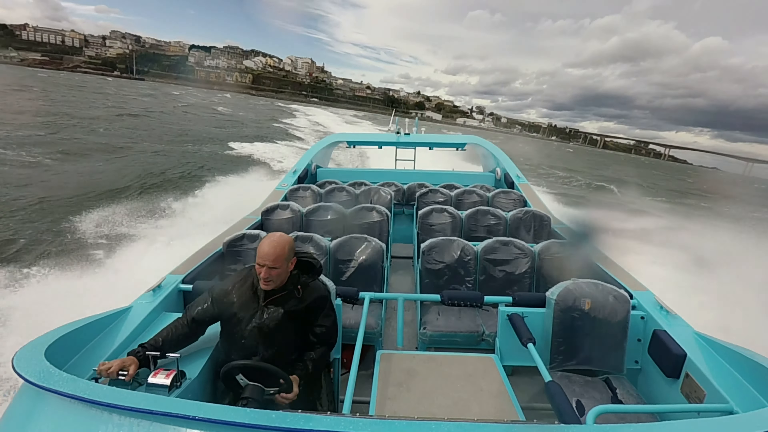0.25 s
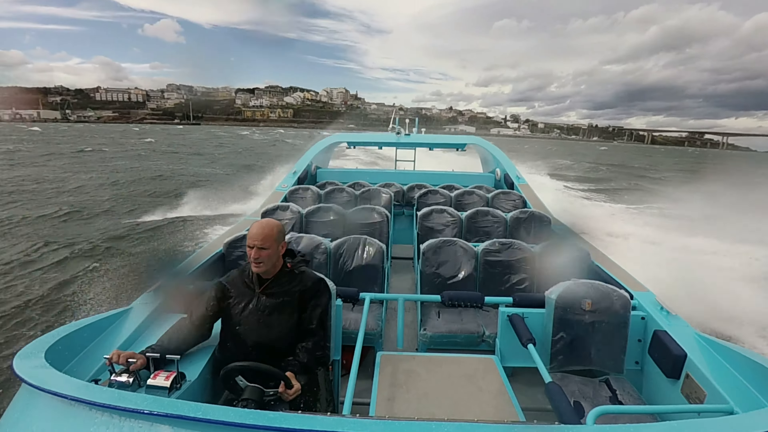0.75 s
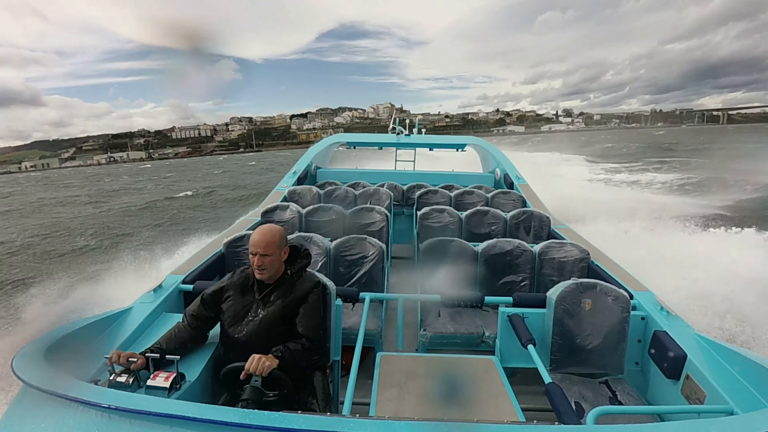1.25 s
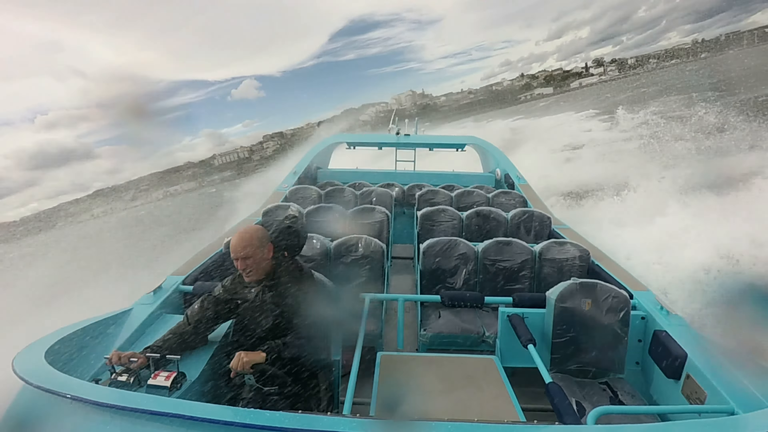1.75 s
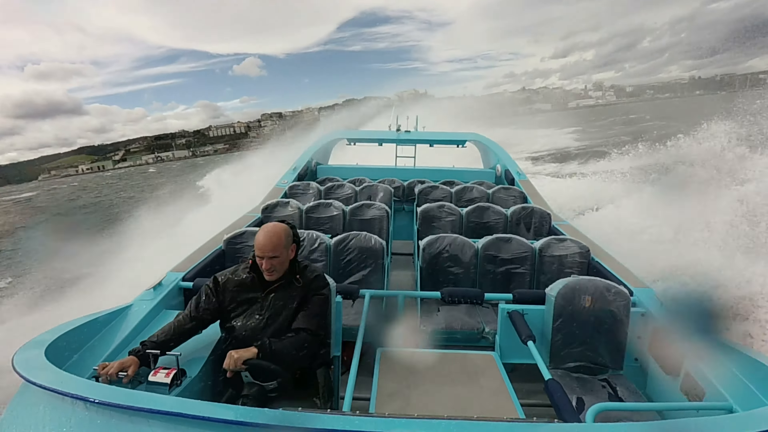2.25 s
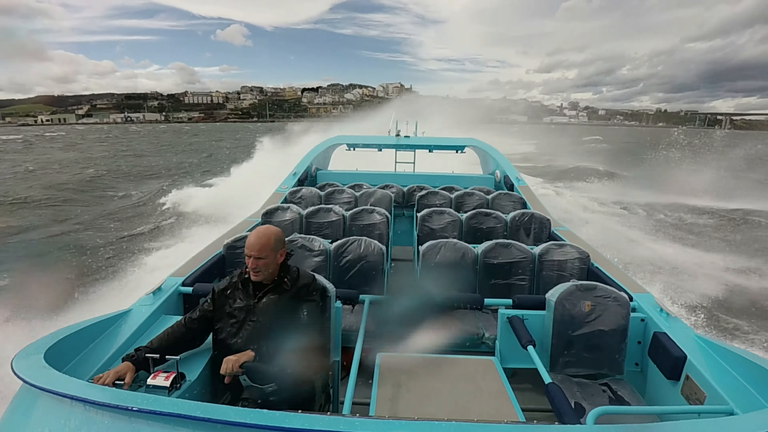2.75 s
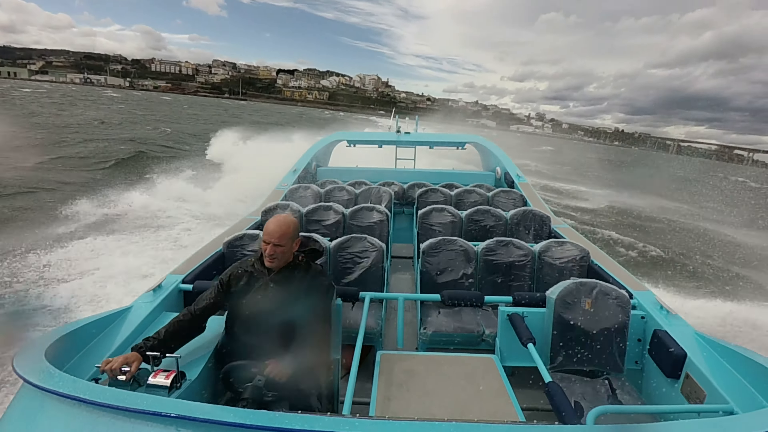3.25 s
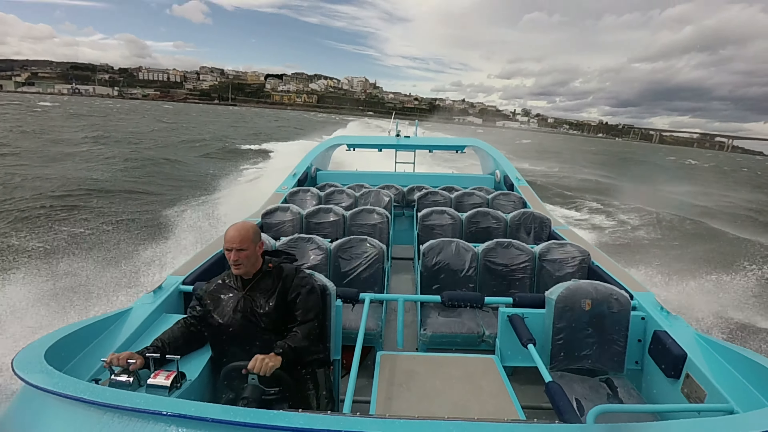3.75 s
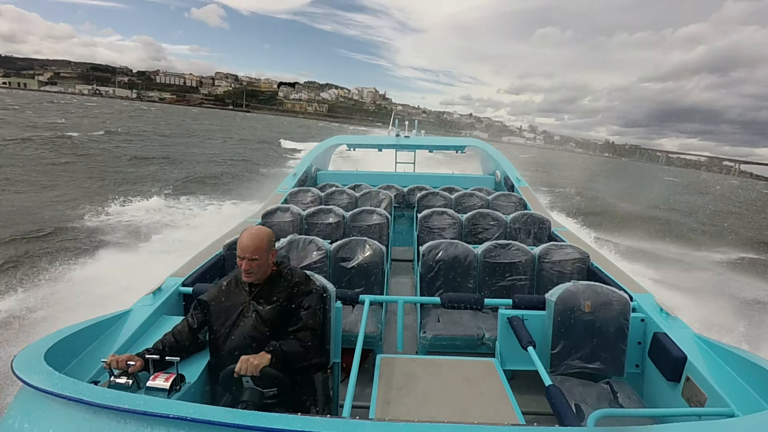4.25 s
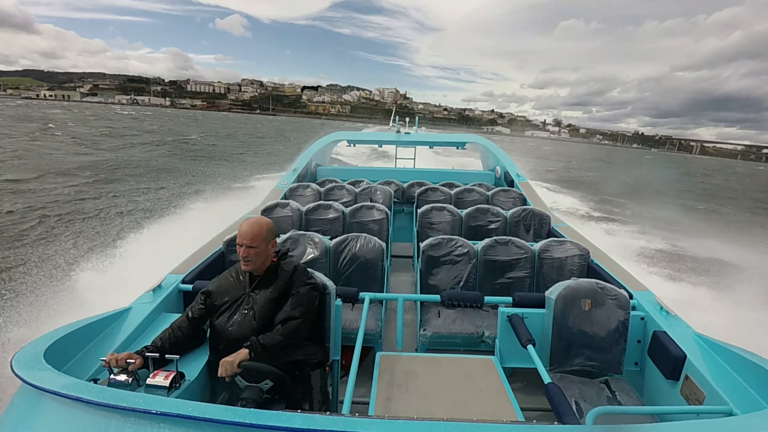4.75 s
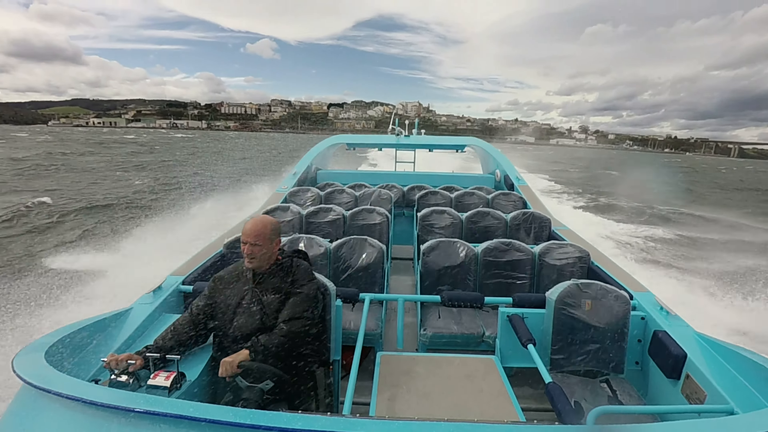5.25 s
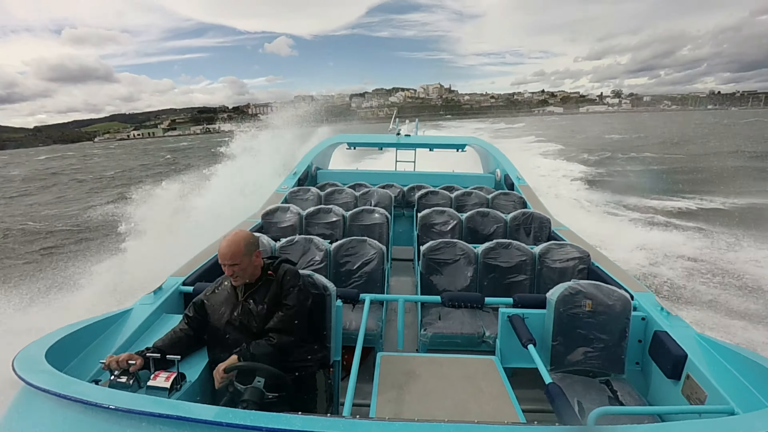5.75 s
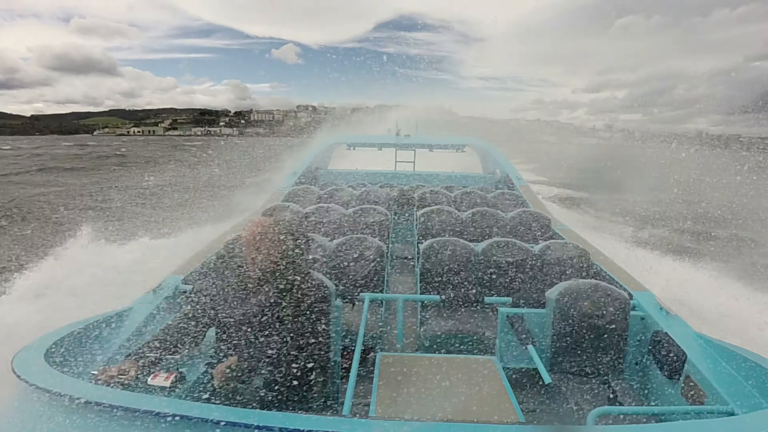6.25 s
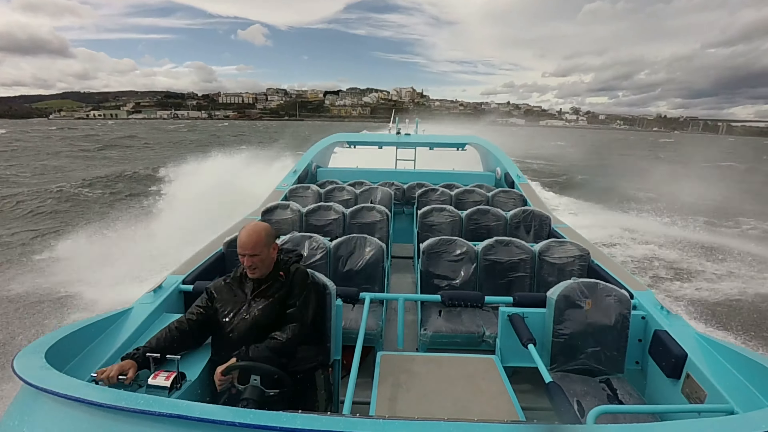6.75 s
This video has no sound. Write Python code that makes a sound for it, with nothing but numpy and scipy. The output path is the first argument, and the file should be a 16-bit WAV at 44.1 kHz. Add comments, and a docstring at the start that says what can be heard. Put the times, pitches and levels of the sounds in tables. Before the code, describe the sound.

Close, mono outdoor sound from a camera at the bow: a low throbbing engine hum, nearly constant in pitch, swells and thins as the boat rolls. Around it are rumbling wind, rushing water and surging spray, brightest near one second. Knocks against the hull cluster around two seconds, then loud drops click on the camera case at four; softer slaps and thumps follow, with brief wet squeaks near the end.

```python
"""A deep, unsteady drone leads: two six-cylinder diesels in a jet boat running fast through choppy water.
The listening place is a camera on the bow. Engine orders are summed sines; some sit in a booming hull resonance.
Close by, shaped noise makes the wind at the microphone, water rushing along the hull and thin whistling air.
Random impacts over noise make hissing spray. Noise bursts and decaying sines make slaps and hull thumps.
Drops tick on the camera's ringing case, and swept resonant noise makes two short squeaks."""
import sys
import numpy as np
from scipy import signal
from scipy.fft import rfft, irfft, next_fast_len
from scipy.io import wavfile
from scipy.ndimage import uniform_filter1d

SR = 44100
rng = np.random.default_rng(int(sys.argv[2]) if len(sys.argv) > 2 else 0)


def dump(signal):
    """Clip the signal to [-1, 1] and save it as 16-bit WAV at the path in sys.argv[1]."""
    limited = np.clip(np.atleast_2d(signal).T, -1, 1)
    pcm = np.round(limited * 32767).astype(np.int16)
    wavfile.write(sys.argv[1], SR, pcm)


N = 307818
TIME = np.arange(N) / SR

# Engines. An order is a multiple of the four-stroke cycle rate.
CYLINDERS = 6
# lead engine speed: [t/s, firing rate f/Hz]
LEAD_FIRING_RATE = [(0, 155.3), (1.1, 155.5), (1.38, 156.8), (2.05, 156.7), (2.16, 155.4), (2.3, 156.8),
                    (4.3, 156.2), (5.6, 156.8), (6.98, 156.7)]
# second engine speed, eased off in the turn: [t/s, cycle rate f/Hz]
SECOND_CYCLE_RATE = [(0, 23.78), (.7, 23.86), (2.1, 23.88), (2.45, 22.7), (2.7, 23.0), (2.95, 23.85),
                     (3.2, 23.95), (4.3, 23.88), (5.6, 23.93), (6.98, 23.93)]
# how hard the second engine works: [t/s, level relative to full load/dB]
SECOND_LOAD_CURVE = [(0, -2.5), (.65, -2.5), (1.0, -7), (1.5, -7), (1.8, -13), (2.2, -4), (2.42, -25.5),
                     (2.7, -7), (3.2, -1), (4.0, -6.5), (4.3, -3.5), (5.25, -3.5), (5.55, -1), (6.98, -.5)]
# lead firing tone, swelling as the boat rolls: [t/s, level before throb and dunking/dB]
FIRING_LEVEL = [(0, -15.5), (0.17, -13.5), (0.43, -22), (0.6, -18.5), (0.8, -25), (1.22, -13.0),
                (1.65, -21.5), (1.87, -20.0), (2.35, -22.5), (2.55, -20), (3.2, -21), (4.2, -20.5),
                (4.4, -17.5), (5.3, -18.5), (5.6, -16), (6.4, -18.5), (6.98, -17)]
# level shared by the lead exhaust overtones: [t/s, level/dB]
OVERTONE_LEVEL = [(0, -41), (.65, -42), (1.3, -32.5), (2.15, -38), (2.7, -44), (3.0, -38), (3.5, -35),
                  (3.85, -42), (4.5, -31.5), (5.2, -31.5), (5.7, -33), (6.27, -34.5), (6.5, -29.5),
                  (6.98, -31)]
# lead exhaust overtones: [order, level relative to the shared level/dB]
LEAD_EXHAUST_ORDERS = [(4, -8), (9, -8.5), (10, -12.5), (11, 1), (12, -4.5)]
# second exhaust: [order, level at full load/dB]
SECOND_EXHAUST_ORDERS = [(12, -32.5), (18, -26)]
# chop covers the lead exhaust (a negative depth lifts it instead): [t/s, depth/dB]
EXHAUST_DUNKS = [(.86, -4), (2.04, 6), (2.43, 6), (2.69, 8.5), (4.51, 6), (5.43, 7)]
DUNK_S = 0.091  # sets the width of each dip: 1/e of its depth is left half this time from its centre
# orders of each engine inside the hull resonance: [order, level relative to the boom/dB]
LEAD_BOOM_ORDERS = [(14, -5)]
SECOND_BOOM_ORDERS = [(15, -9), (16, -5.5)]
BOOM_DB, BOOM_PER_LOAD = -24, 0.48  # boom gain at full load, and the dB it loses per dB of load
# steady mechanical growl of each engine block: [order, level/dB]
LEAD_GROWL_ORDERS = [(17, -51.5), (22, -52), (24, -41.5), (26, -47.5), (27, -46), (28, -59.5), (29, -48.5),
                     (30, -45)]
SECOND_GROWL_ORDERS = [(24, -66), (30, -41.5), (31, -51.5)]

# Wind and water.
# flow past the bow: [t/s, wind level/dB, rushing water level/dB]
FLOW_LEVELS = [(0, -27, -28), (.5, -29, -32), (1.3, -27.5, -29), (1.7, -34, -31), (2.2, -29.5, -32),
               (3.05, -32, -32), (3.6, -31, -30.5), (3.78, -31.5, -35), (4.2, -29.5, -30),
               (4.95, -27.5, -29), (5.35, -27, -27.5), (5.8, -31.5, -28.5), (6.98, -31.5, -28.5)]
# spectrum of wind at the microphone: [f/Hz, relative level/dB]
WIND_SPECTRUM = [(5, -38), (15, -26), (30, -27.5), (50, -10), (75, -7.5), (105, -3), (150, 0), (200, -6),
                 (270, -4.5), (400, -8), (700, -26)]
# spectrum of water along the hull: [f/Hz, relative level/dB]
RUSH_SPECTRUM = [(120, -16), (220, -6.5), (330, 3), (430, 3), (520, -0.5), (630, 5), (750, 3.5),
                 (860, -1.5), (1050, -10.5), (1400, -21), (2200, -19.5)]
# water thrown up by the bow, wave after wave: [t/s, splashing level/dB, flying drops level/dB], before surges
SPRAY_LEVELS = [(0, -36.5, -41.5), (.7, -38.5, -42), (.9, -31, -35), (1.1, -30.5, -35.5), (1.75, -38, -40),
                (2.05, -36.5, -35), (2.6, -37, -36), (3.0, -42.5, -39), (3.52, -40, -38.5), (3.7, -47, -44),
                (3.93, -44.5, -47.5), (4.08, -42.5, -43), (4.3, -42, -48), (4.52, -36.5, -42.5),
                (5.05, -39, -43), (5.45, -34, -37.5), (5.8, -41.5, -44), (6.0, -36.5, -37.5),
                (6.35, -35, -41), (6.55, -42, -41), (6.98, -44, -45)]
# gain on the top of the mist's hiss: [t/s, level relative to unchanged/dB]
MIST_TOP_GAIN = [(0, 4), (1.1, 3.5), (3.5, 2), (3.7, -2), (6.98, -12)]
MIST_TOP_HZ = 10200
# spectra of heavy splashes, flying drops and fine mist: [f/Hz, relative level/dB]
SPLASH_SPECTRUM = [(450, -21), (800, 4.5), (1100, 1.5), (1450, -1.5), (1800, -7.5), (2150, -11.5),
                   (2800, -11.5), (4000, -44)]
DROP_SPECTRUM = [(1600, -17.5), (2150, -14), (2450, -1.5), (2750, 3), (3000, -0.5), (3400, -9), (4000, -18),
                 (4500, -26), (5000, -41.5)]
MIST_SPECTRUM = [(3800, -6.5), (4900, -9.5), (5600, -3), (6400, -4), (7400, -3), (8500, -1), (9500, 1.5),
                 (10250, -4.5), (11000, -12.5), (12000, -28.5), (14000, -45)]
MIST_DB, MIST_FROM_SPLASH = -17, .3  # mist relative to a blend of drops and splashing; share of splashing
THIN_MIST_DB, FLURRY_DB = -59.5, 4  # below this level flurries set in, reaching this rms depth 3 dB lower
SPRAY_SURGE_DB, SURGES_PER_S = 1.29, 16
# puffs of air past the wet case: [t/s, length/s, first f/Hz, last f/Hz, width f/Hz, level before flicker/dB]
WHISTLE_PUFFS = [(0, 0.073, 8900, 8100, 500, -47.5), (0.139, 0.2, 8700, 8300, 600, -47.5),
                 (0.342, 0.23, 9100, 8900, 600, -46), (.57, 0.36, 8500, 9500, 700, -50.5),
                 (0.775, .78, 9800, 9900, 1100, -47), (3.562, 1, 6700, 6960, 350, -65),
                 (4.35, 0.22, 7500, 8300, 450, -53), (4.611, .42, 7800, 7800, 420, -55.5),
                 (5.172, .17, 8000, 8000, 500, -58), (5.525, 0.27, 7700, 7650, 420, -62),
                 (6.56, 0.53, 7150, 7250, 400, -66)]
# stages of the whistle: [frequency ratio, relative level/dB]
WHISTLE_PARTS = [(.67, -17.5), (1, -4.5), (1.191, -11)]
WHISTLE_FADE = 0.28  # share of each puff spent swelling and fading

# Impacts and rubs.
# water slapping the hull: [t/s, level before the envelope/dB, centre f/Hz, decay to 1/e/s]
HULL_SLAPS = [(2.059, -21.5, 1700, .009), (2.133, -20.5, 590, 0.0092), (2.141, -14.5, 616, 0.0054),
              (2.151, -24.5, 1800, 0.0066), (2.151, -20, 303, .032), (4.945, -25, 616, 0.047),
              (6.364, -29.5, 2070, 0.034)]
# hull landing on a wave: [t/s, level before the envelope/dB, f/Hz, decay to 1/e/s]
HULL_THUMPS = [(2.15, -15, 104, 0.034), (2.163, -1, 200, 0.0017), (3.569, -23, 89, .04),
               (5.109, -20, 102, .04)]
# drops striking the camera: [t/s, level of the blow/dB]
DROP_HITS = [(2.2821, -7), (4.0679, -1.5), (4.0707, -5)]
# spectrum of the blow on the camera case: [f/Hz, relative level/dB]
CASE_SPECTRUM = [(100, -7), (600, 11), (1100, -0.5), (1500, -0.5), (2050, -3.5), (2700, 5), (3050, 0.5),
                 (3500, -7.5), (4200, -13.5), (4900, -38), (5700, -22.5), (7300, -25), (9100, -16.5),
                 (11500, -32), (16000, -73)]
# case modes that outlast the blow: [f/Hz, level relative to the blow/dB, t60/s]
CASE_RINGING = [(1620, -18.5, 0.015), (2840, -14, 0.017)]
# wet rubbing: [t/s, length/s, first f/Hz, last f/Hz, level/dB]
SQUEAK_GLIDES = [(6.357, 0.038, 1950, 1890, -37), (6.439, .065, 1960, 1850, -41)]
EDGE_HZ = 15100


def gain_of(db):
    """Decibels to amplitude."""
    return 10 ** (np.asarray(db) / 20)


def evened(x):
    """Scales to rms 1."""
    return x / np.sqrt(np.mean(x ** 2) + 1e-20)


def curves(rows):
    """Each column of a time table, sample by sample."""
    s, *columns = np.transpose(rows)
    return [np.interp(TIME, s, column) for column in columns]


def read(points, hz):
    """A spectrum on a log-frequency axis, falling steeply beyond its top."""
    f, db = np.transpose(points)
    octaves_above = np.log2(np.maximum(hz / f[-1], 1))
    return np.interp(np.log(hz + 1), np.log(f + 1), db) - 60 * octaves_above


def add(mix, s, sound):
    """Mixes a sound in at time s."""
    part = mix[round(s * SR):][:len(sound)]
    part += sound[:len(part)]


def wander(rate):
    """Slow random motion of rms 1, up to about rate changes a second."""
    size, points_per_s = 4096, 400
    f = np.fft.rfftfreq(size, 1 / points_per_s)
    slow = irfft(rfft(rng.standard_normal(size)) / np.sqrt(1 + (f / rate) ** 4))
    return evened(np.interp(TIME * points_per_s, np.arange(size), slow))


def resonate(x, hz, width):
    """A resonance of gain 1 that follows hz: shift it down to 0 Hz, smooth, shift back up."""
    turn = np.exp(2j * np.pi * np.cumsum(hz * np.ones(len(x))) / SR)
    pole = np.exp(-np.pi * width / SR)
    return 2 * (turn * signal.lfilter([1 - pole], [1, -pole], x / turn)).real


def resonate_twice(x, hz, width):
    """Two equal resonances in a row, for steeper skirts; rms 1."""
    return evened(resonate(resonate(x, hz, width), hz, width))


def coloured(x, colour):
    """Gives x a spectrum; rms 1."""
    size = next_fast_len(N)
    gain = gain_of(read(colour, np.fft.rfftfreq(size, 1 / SR)))
    return evened(irfft(rfft(x, size) * gain, size)[:N])


def turbulence(colour, gust_db, gust_rate):
    """Noise that surges with eddies."""
    noise = coloured(rng.standard_normal(N), colour)
    return evened(noise * gain_of(gust_db * wander(gust_rate)))


def droplets(colour, per_s, spread_db, share):
    """A shower of tiny impacts of uneven size over the smooth hiss of distant ones; share is the impacts' power."""
    sizes = gain_of(spread_db * np.minimum(rng.exponential(1, N), 4))
    hits = sizes * rng.choice([-1, 1], N) * (rng.random(N) < per_s / SR)
    hiss = rng.standard_normal(N)
    return coloured(np.sqrt(share) * evened(hits) + np.sqrt(1 - share) * hiss, colour)


def engine_orders(turns, orders, flutter, flutter_rate):
    """Sines locked to the engine cycle, each wandering in strength and phase."""
    out = np.zeros(N)
    for order, db in orders:
        phase = 2 * np.pi * (round(order) * turns + rng.random())
        in_step = (1 + flutter * wander(flutter_rate)) * np.cos(phase)
        out_of_step = flutter * wander(flutter_rate) * np.sin(phase)
        out += gain_of(db) * (in_step + out_of_step)
    return out * np.sqrt(2 / (1 + 2 * flutter ** 2))  # each order to about its tabled rms


def engine_cycles(cycles_per_s, unsteadiness):
    """Four-stroke cycles turned so far, at a speed that trembles slightly."""
    return np.cumsum(cycles_per_s * (1 + unsteadiness * wander(7.15))) / SR


def dunking():
    """The dB lost while chop covers the lead exhaust: one smooth bump per table row."""
    return sum(depth_db * np.exp(-(2 * (TIME - s) / DUNK_S) ** 2) for s, depth_db in EXHAUST_DUNKS)


def exhausts(lead, second, load_db, throb_db=1.45, throb_rate=8):
    """Six firings a cycle give a deep tone that throbs in the chop; unequal cylinders fill in other orders."""
    firing_db, overtones_db = curves(FIRING_LEVEL) + curves(OVERTONE_LEVEL)
    firing = gain_of(firing_db + throb_db * wander(throb_rate)) * np.sin(2 * np.pi * CYLINDERS * lead)
    lead_tones = gain_of(overtones_db) * engine_orders(lead, LEAD_EXHAUST_ORDERS, flutter=.25, flutter_rate=3)
    second_tones = engine_orders(second, SECOND_EXHAUST_ORDERS, flutter=.16, flutter_rate=5)
    return gain_of(-dunking()) * (firing + lead_tones) + gain_of(load_db) * second_tones


def hull_boom(lead, second, load_db, hz=373, width=26, surge_db=1.6, surge_rate=7):
    """Close orders of both engines beat in a hull resonance, over rough vibration; it grows with the load."""
    lead_tones = engine_orders(lead, LEAD_BOOM_ORDERS, flutter=.25, flutter_rate=3)
    second_tones = engine_orders(second, SECOND_BOOM_ORDERS, flutter=.25, flutter_rate=3)
    rough = gain_of(-10) * resonate_twice(rng.standard_normal(N), hz, width)
    boom_db = BOOM_DB + BOOM_PER_LOAD * load_db + surge_db * wander(surge_rate)
    return gain_of(boom_db) * (lead_tones + second_tones + rough)


def growl(lead, second):
    """Higher orders radiated by the engine blocks."""
    lead_block = engine_orders(lead, LEAD_GROWL_ORDERS, flutter=.35, flutter_rate=2.5)
    second_block = engine_orders(second, SECOND_GROWL_ORDERS, flutter=.5, flutter_rate=2.5)
    return lead_block + second_block


def wind_and_wake():
    """Wind rumbles at the microphone while water rushes along the hull: two bands of gusting noise."""
    wind_db, rush_db = curves(FLOW_LEVELS)
    wind = gain_of(wind_db) * turbulence(WIND_SPECTRUM, gust_db=1.2, gust_rate=6.0)
    rush = gain_of(rush_db) * turbulence(RUSH_SPECTRUM, gust_db=2.47, gust_rate=54)
    return wind + rush


def spray():
    """Heavy splashes and flying drops thrown up by the bow, with fine mist whose level is tied to both."""
    splash_db, drops_db, top_db = curves(SPRAY_LEVELS) + curves(MIST_TOP_GAIN)
    mist_db = MIST_DB + drops_db + MIST_FROM_SPLASH * (splash_db - drops_db)
    surge_db = SPRAY_SURGE_DB * wander(SURGES_PER_S)  # sheets of water arrive unevenly
    thinness = np.clip((THIN_MIST_DB - mist_db) / 3, 0, 1)
    flurries_db = FLURRY_DB * thinness * wander(22)

    splash = droplets(SPLASH_SPECTRUM, per_s=900, spread_db=4.5, share=0.28)
    splash *= gain_of(splash_db + surge_db)
    drops = droplets(DROP_SPECTRUM, per_s=2500, spread_db=2.0, share=0.44)
    drops *= gain_of(drops_db + surge_db)
    mist = droplets(MIST_SPECTRUM, per_s=4000, spread_db=3.5, share=0.4)
    mist *= gain_of(mist_db + .5 * surge_db + flurries_db)

    highpass = signal.butter(10, MIST_TOP_HZ, "high", fs=SR, output="sos")
    mist_top = signal.sosfiltfilt(highpass, mist)
    return splash + drops + mist + (gain_of(top_db) - 1) * mist_top


def hull_knocks(spread=1.23, crackle_db=2.0):
    """Short crackly bursts of water against the hull, and the damped thump of its panels."""
    out, t = np.zeros(N), np.arange(SR // 4) / SR
    for s, db, hz, decay in HULL_SLAPS:
        crackle = evened(uniform_filter1d(rng.standard_normal(len(t)), size=40))
        water = rng.standard_normal(len(t)) * gain_of(crackle_db * crackle)
        burst = resonate_twice(water, hz, spread * hz)
        envelope = np.exp(-t / decay) * (1 - np.exp(-t / 0.0016))
        add(out, s, gain_of(db) * burst * envelope)
    for s, db, hz, decay in HULL_THUMPS:
        envelope = np.exp(-t / decay) * (1 - np.exp(-t / 0.00072))
        add(out, s, gain_of(db) * np.sin(2 * np.pi * hz * t) * envelope)
    return signal.sosfilt(signal.butter(6, 3400, fs=SR, output="sos"), out)


def camera_drops(size=2048):
    """Each drop is one sharp blow that rings the camera case for a few milliseconds."""
    case_db = read(CASE_SPECTRUM, abs(np.fft.fftfreq(size, 1 / SR)))
    log_gain = np.log(gain_of(np.maximum(case_db, -100)))
    # minimum phase: the energy comes as early as this spectrum allows
    blow = np.fft.ifft(np.exp(np.conj(signal.hilbert(log_gain)))).real[:size // 2]
    t = TIME[:len(blow)]
    ring = sum(gain_of(db - 60 * t / t60) * np.sin(2 * np.pi * hz * t) for hz, db, t60 in CASE_RINGING)
    tick = blow / abs(blow).max() + ring
    out = np.zeros(N)
    for s, db in DROP_HITS:
        add(out, s, gain_of(db) * tick)
    return out


def squeaks(width=170):
    """Something wet rubs and squeaks briefly: noise in a narrow resonance falling in pitch."""
    out = np.zeros(N)
    for s, length, first_hz, last_hz, db in SQUEAK_GLIDES:
        hz = np.linspace(first_hz, last_hz, round(length * SR))
        tone = resonate_twice(rng.standard_normal(len(hz)), hz, width)
        add(out, s, gain_of(db) * tone * signal.windows.tukey(len(hz), .5))
    return out


def whistles(waver=0.028, flicker_db=3):
    """Each puff is a breathy edge tone, narrow noise that glides and flutters, with weaker side stages."""
    out = np.zeros(N)
    for s, length, first_hz, last_hz, width, db in WHISTLE_PUFFS:
        size = round(length * SR)
        hz = np.linspace(first_hz, last_hz, size) * (1 + waver * wander(28)[:size])
        air = rng.standard_normal(size)
        tone = np.zeros(size)
        for ratio, stage_db in WHISTLE_PARTS:
            tone += gain_of(stage_db) * resonate_twice(air, hz * ratio, width)
        level = gain_of(db + flicker_db * wander(25)[:size])
        add(out, s, level * signal.windows.tukey(size, WHISTLE_FADE) * tone)
    return signal.sosfilt(signal.butter(14, 10400, fs=SR, output="sos"), out)


def scene():
    """Everything as it reaches the bow, in one channel."""
    lead = engine_cycles(curves(LEAD_FIRING_RATE)[0] / CYLINDERS, unsteadiness=.0015)
    second = engine_cycles(curves(SECOND_CYCLE_RATE)[0], unsteadiness=.0012)
    load_db, = curves(SECOND_LOAD_CURVE)
    drone = exhausts(lead, second, load_db) + hull_boom(lead, second, load_db) + growl(lead, second)
    water_and_air = wind_and_wake() + spray() + whistles()
    impacts_and_rubs = hull_knocks() + camera_drops() + squeaks()
    return (drone + water_and_air + impacts_and_rubs)[None]


def record(dry):
    """Full-scale limit, soft ends, then the band limit."""
    limited = np.clip(dry, -1, 1) * signal.windows.tukey(N, .001)
    lowpass = signal.firwin(511, EDGE_HZ, window=("kaiser", 9), fs=SR)
    return signal.oaconvolve(limited, lowpass[None], "same")


dry = scene()
out = record(dry)
dump(out)
```